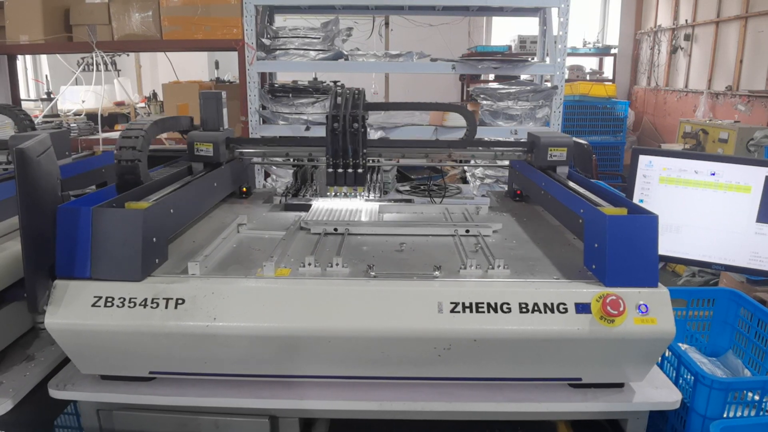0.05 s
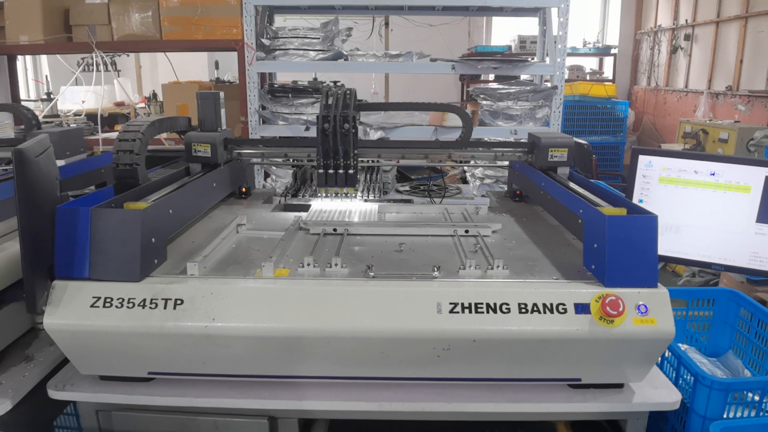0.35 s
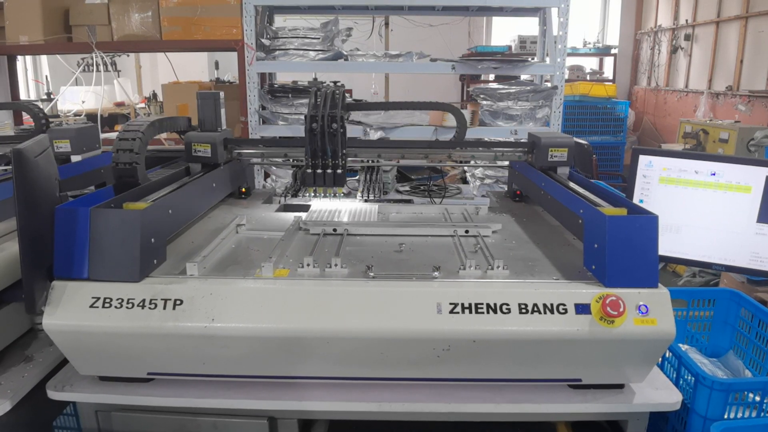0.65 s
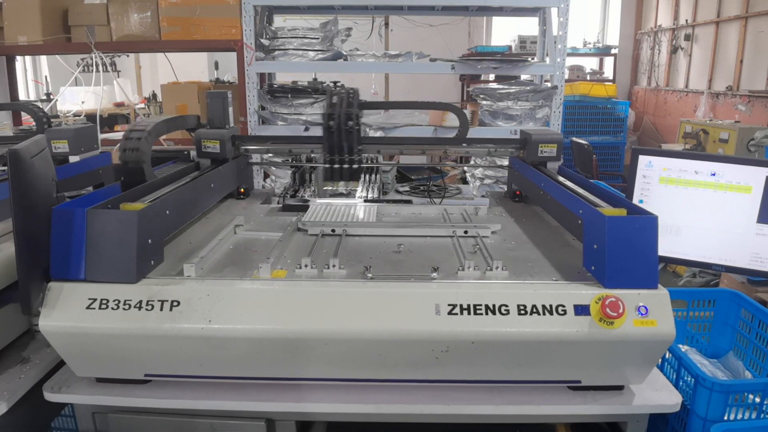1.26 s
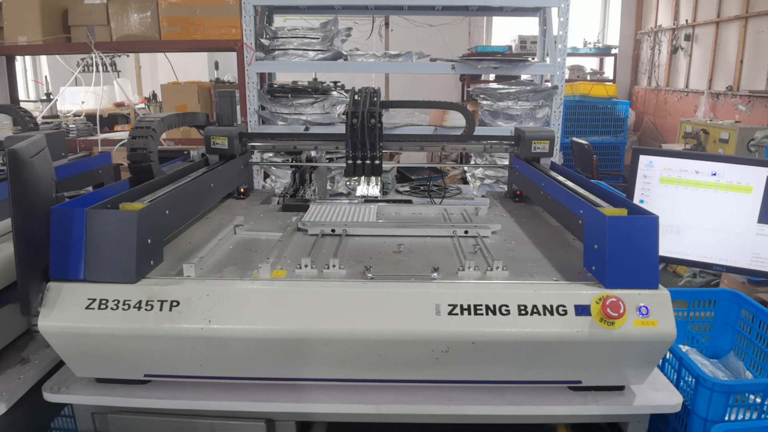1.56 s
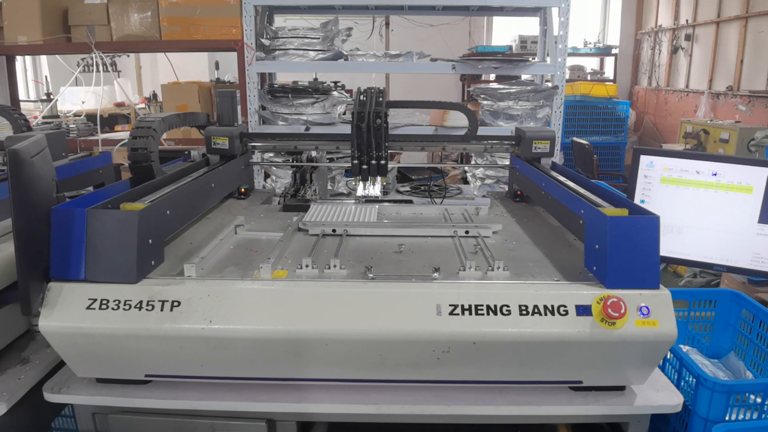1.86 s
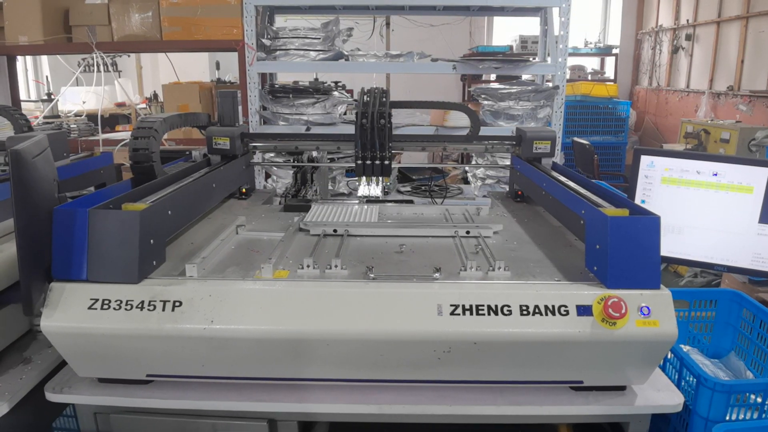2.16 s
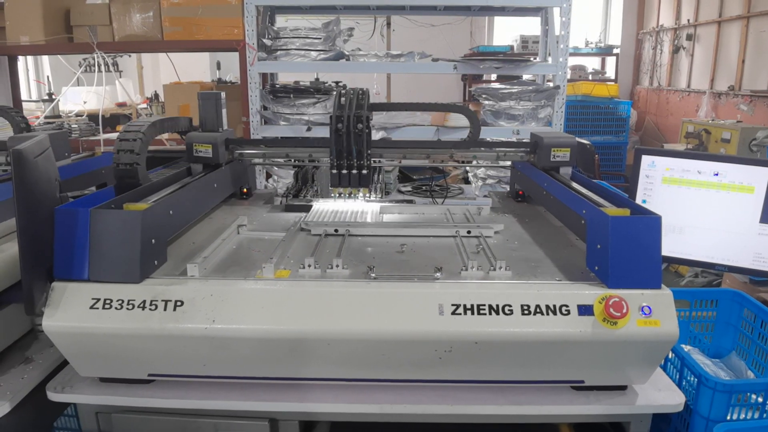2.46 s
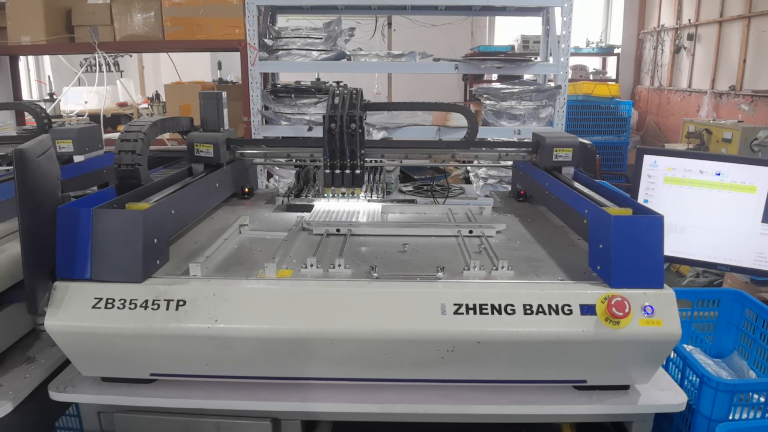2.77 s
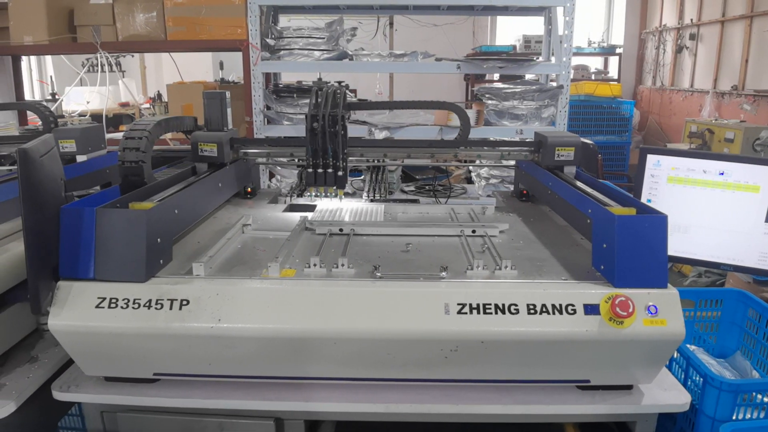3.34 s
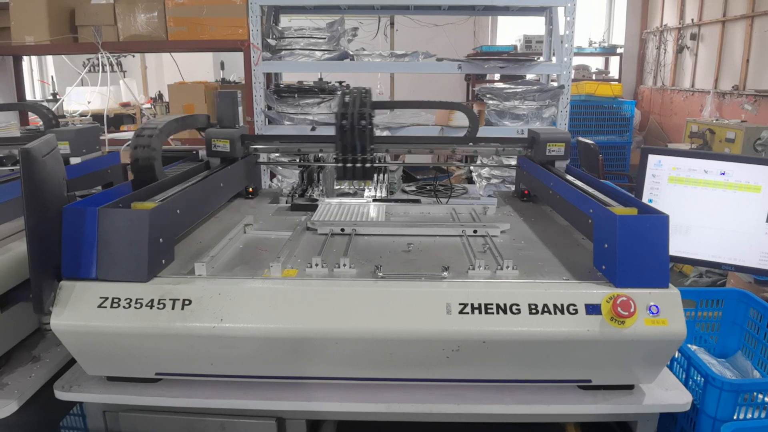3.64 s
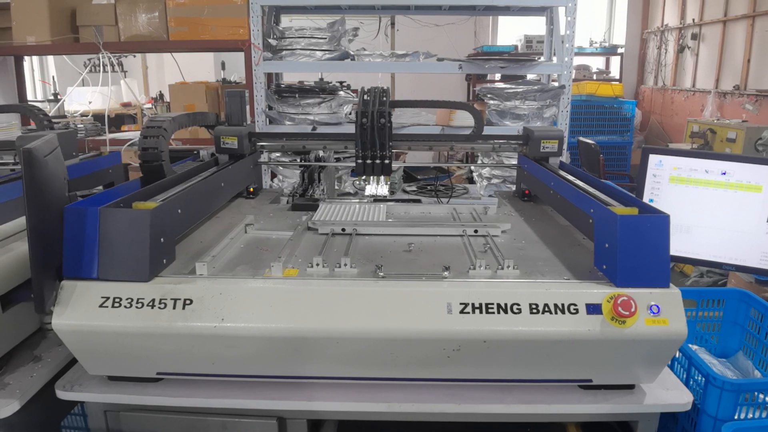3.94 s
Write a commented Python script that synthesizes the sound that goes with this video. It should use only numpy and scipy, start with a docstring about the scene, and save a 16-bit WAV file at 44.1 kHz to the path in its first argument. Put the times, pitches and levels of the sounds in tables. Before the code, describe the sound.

A desktop assembly machine hisses brightly with thin whistles, the air pausing briefly near 0.2 and 2.4 seconds. Its head rushes along rails with a rattle and soft thump at the start and around 1.3, 2.4 and 3.7 seconds, with quieter moves between. Valves puff and tick near 0.6, 1.6, 3.1 and 3.9 seconds. Small motors whir and faintly whine upward throughout, over a low workshop rumble.

```python
"""A bright hiss and the rush of a fast gantry run are heard first: a desktop pick-and-place machine at work.
Air drawn through its vacuum nozzles hisses and whistles, pausing twice. In fast and slow runs, bearing balls
rattle along the rails and excite the modes of the frame. The shaken table sways and hums, small motors whir
as the nozzles go up and down, valves puff and tick, and axis motors whine upwards as they gather speed.
The low rumble of the workshop lies underneath."""
import sys
import numpy as np
from scipy import signal
from scipy.fft import rfft, irfft
from scipy.io import wavfile

SR = 44100
rng = np.random.default_rng(int(sys.argv[2]) if len(sys.argv) > 2 else 0)


def wav_out(sig):
    """Save sig, one row per channel (or a flat mono array), as 16-bit PCM at SR to the path in sys.argv[1]."""
    wavfile.write(sys.argv[1], SR, np.round(np.clip(np.atleast_2d(sig).T, -1, 1) * 32767).astype(np.int16))


N = 176400
T = np.arange(N) / SR
HZ = np.maximum(np.arange(N // 2 + 1) * SR / N, 1)

# likeness of the sound at the two ears: (frequency [Hz], coherence [0-1])
COHERENCE = [(100, 0.92), (300, 0.9), (700, 0.4), (1300, 0), (2200, 0), (8000, 0.01)]
# air flow through the nozzles: (time [s], level [dB])
AIR_FLOW = [(0, -23), (.15, -26), (.2, -39.5), (.245, -38), (.325, -25), (.43, -23.5), (.62, -25),
            (.82, -25.5), (1.3, -26.5), (1.6, -26.5), (2.36, -24.5), (2.41, -28), (2.44, -41.5),
            (2.5, -37.5), (2.6, -26.5), (2.77, -24), (3.3, -27), (4, -26.5)]
# spectral shape of the hiss: (frequency [Hz], left level [dB], right level [dB])
HISS_SPECTRUM = [(1050, -42, -31), (1725, -42, -26), (2160, -35, -27), (2550, -47, -16),
                 (3190, -23.5, -13.5), (4160, -13, -7.5), (4660, -28, -9), (5240, -16, -3),
                 (5960, -10, 0.5), (6320, -29, -3), (7440, -20.5, -2), (8190, -39, -10), (8980, -12, -19.5),
                 (10500, -18, -16), (13300, -19.5, -23), (15100, -18.5, -35), (15960, -7.5, -17)]
HIGH_WHISTLE_HZ, LOW_WHISTLE_HZ = 5930, 4060
# nozzle whistles: (peak time [s], duration [s], level over the flow [dB], pitch [Hz], bandwidth [Hz])
NOZZLE_WHISTLES = [(0.605, 0.77, 3, HIGH_WHISTLE_HZ, 330), (1.27, 0.65, 2.5, HIGH_WHISTLE_HZ, 280),
                   (2.75, 0.34, 2, HIGH_WHISTLE_HZ, 380), (3.24, 1.95, 2.5, HIGH_WHISTLE_HZ, 280),
                   (2.97, 1.07, -2.5, LOW_WHISTLE_HZ, 130), (3.535, 0.39, -4, LOW_WHISTLE_HZ, 130)]
# gantry runs: (time of top speed [s], speeding up [s], slowing down [s], level [dB],
# cutoff at top speed [Hz], boom relative to the run [dB], drone relative to the run [dB])
GANTRY_RUNS = [(0.02, 0.072, 0.25, -17, 1570, -10, -12.5), (0.439, 0.055, 0.39, -32.5, 2090, -37, -20),
               (1.316, 0.11, 0.16, -15.5, 1770, -6.5, -16), (1.475, 0.092, 0.26, -25.5, 1500, -17, -23),
               (1.958, .26, 0.18, -31.5, 3280, -25, -30), (2.39, 0.085, 0.21, -16.5, 1430, -6, -4),
               (2.71, 0.3, 0.14, -28.5, 1610, -23, -30), (3.31, 0.24, 0.1, -33.5, 1360, -33, -5.5),
               (3.689, 0.11, 0.25, -16.5, 1640, -9.5, -41)]
# spectral shape of the rolling noise: (frequency [Hz], level [dB])
RAIL_SPECTRUM = [(40, -6), (150, -12), (240, -4.5), (450, -5.5), (600, -7.5), (900, -5), (1350, -2),
                 (1600, -4), (3000, -4)]
# resonances of the frame: (frequency [Hz], relative level [dB])
FRAME_MODES = [(185, -12), (398, -9), (562, -6.5), (610, 0.5), (690, -2.5), (727, 2.5), (800, 1.5),
               (916, -1), (1025, -2.5), (1076, 0.5), (1123, -4), (1203, 0), (1320, -5), (1365, 3)]
# spectral shape of the workshop background: (frequency [Hz], level [dB])
WORKSHOP_SPECTRUM = [(35, -3), (100, -4), (140, -10), (190, -2.5), (240, -12.5), (300, -7.5), (400, -15),
                     (800, -21.5), (1500, -19), (4000, -15), (7000, -28), (10000, -15)]
# swells of the table's low hum: (peak time [s], duration [s], level [dB])
TABLE_HUMS = [(.15, 0.16, -32), (.48, 0.033, -37), (.93, 0.31, -42), (3.1, 0.1, -38), (3.4, 0.2, -35)]
# low sways of the table as the gantry moves: (peak time [s], duration [s], level [dB])
TABLE_SWAYS = [(.53, 0.21, -37.5), (1.39, 0.34, -31.5), (1.75, 0.34, -34), (2.06, 0.32, -40.5),
               (2.551, 0.28, -37.5), (3.242, 0.39, -39.5), (3.698, 0.57, -37.5)]
# nozzles lifting and lowering: (peak time [s], duration [s], level [dB], top pitch [Hz])
NOZZLE_LIFTS = [(0.47, 0.2, -37.5, 2500), (0.935, 0.14, -38, 2710), (1.165, 0.17, -35, 2803),
                (1.578, 0.33, -37, 2655), (1.841, 0.25, -32.5, 2596), (2.004, 0.16, -33, 2840),
                (2.52, 0.34, -38, 2740), (2.975, 0.12, -38.5, 2587), (3.17, 0.13, -33, 2550),
                (3.387, 0.13, -37.5, 2690), (3.79, 0.24, -33, 2367), (3.954, 0.25, -37, 2470)]
# air let out by the valves: (onset [s], level [dB], pitch [Hz], attack [s], hold [s])
VALVE_PUFFS = [(0.62, -26.5, 11600, 0.0092, 0.037), (1.561, -27, 9840, .008, 0.063),
               (3.09, -26, 11150, 0.037, 0.039), (3.942, -24, 9500, 0.0044, 0.021)]
# valves switching: (onset [s], level [dB])
VALVE_TICKS = [(0.682, -23), (1.28, -31), (1.578, -22), (1.665, -24.5), (2.945, -22.5), (3.15, -23),
               (3.415, -31)]
# axis motors speeding up: (peak time [s], duration [s], level [dB], pitch at the peak [Hz])
AXIS_WHINES = [(0.882, 0.12, -43.5, 285), (1.11, 0.12, -49, 295), (1.252, 0.15, -35.5, 392),
               (2.564, 0.12, -36.5, 400), (2.625, 0.13, -39.5, 505), (3.147, 0.13, -45, 280),
               (3.564, 0.15, -40.5, 285)]


def from_db(db):
    """Amplitude grows tenfold for every 20 dB."""
    return 10 ** (np.asarray(db) / 20)


def unit_power(x):
    """Division by the root mean square gives a power of one."""
    return x / np.sqrt(np.mean(x ** 2) + 1e-20)


def over_hz(points, column=1):
    """Interpolation of a spectrum table on a logarithmic frequency axis."""
    points = np.array(points)
    return np.interp(np.log(HZ), np.log(points[:, 0]), points[:, column])


def coloured(x, gain):
    """Linear filtering multiplies the spectrum by a gain; unit power."""
    return unit_power(irfft(rfft(x) * gain, N))


def resonance(hz, width_hz):
    """Frequency response of a damped oscillator, 1 at its peak."""
    return 1 / (1 + 1j * (HZ ** 2 - hz ** 2) / (HZ * width_hz))


def drift(rate_hz):
    """Low-passed noise gives a random fluctuation of unit power."""
    return coloured(rng.standard_normal(N), 1 / (1 + (HZ / rate_hz) ** 2))


def stereo_noise(gain):
    """Partial coherence: coloured noise, alike at both ears in the bass and unrelated in the treble."""
    alike = np.clip(over_hz(COHERENCE), 0, 1)
    mid, side = rfft(rng.standard_normal((2, N)))
    spectrum = np.sqrt(1 + alike) * mid + np.sqrt(1 - alike) * side * [[1], [-1]]
    return unit_power(irfft(gain * spectrum, N))


def swell(peak_s, length_s, db):
    """A raised-cosine envelope: the amplitude rises and falls smoothly."""
    return from_db(db) * np.cos(np.pi / 2 * np.minimum(abs(T - peak_s) / (length_s / 2), 1)) ** 2


def wavering(hz, phase=0, wander_rad=0.75):
    """Random phase modulation broadens a pure tone; unit power."""
    wander = wander_rad * drift(27)
    return np.sqrt(2) * np.sin(2 * np.pi * hz * T + phase + wander + rng.uniform(0, 2 * np.pi))


def reflections(count=12, echo_db=-8.5):
    """Interference with echoes off nearby surfaces ripples the spectrum of a steady sound."""
    delays_s = rng.uniform(0.000958, 0.02, (count, 1))
    echoes = np.exp(-2j * np.pi * HZ * delays_s).sum(axis=0) / np.sqrt(count)
    return abs(1 + from_db(echo_db) * echoes)


def reverberation(x, t60_s=0.95):
    """The diffuse field of the workshop decays exponentially, with a separate tail at each ear."""
    t = T[:SR]
    tail = rng.standard_normal((2, SR)) * from_db(-60 * t / t60_s) * (t > 0.006)
    return signal.fftconvolve(x, unit_power(tail) / np.sqrt(SR), axes=1)[:, :N]


def vacuum_nozzles(hiss_db=6, flutter_db=0.94, whistle_left_db=-10.5):
    """Turbulence in narrow nozzles hisses; resonances swell out of it as breathy whistles."""
    colour = from_db([over_hz(HISS_SPECTRUM, column=1), over_hz(HISS_SPECTRUM, column=2)])
    colour = colour * np.array([reflections(), reflections()])
    flow = from_db(np.interp(T, *np.transpose(AIR_FLOW)) + flutter_db * drift(11.3))
    whistles = sum(swell(peak_s, length_s, db) * stereo_noise(resonance(hz, width_hz))
                   for peak_s, length_s, db, hz, width_hz in NOZZLE_WHISTLES)
    hiss = from_db(hiss_db) * stereo_noise(colour)
    return flow * (hiss + whistles * from_db([[whistle_left_db], [0]]))


def rails(clicks_per_s=520, click_db=-1.5, roughness_db=-1.5):
    """Rolling contact: bearing balls add random impacts to a broad, rough noise."""
    clicks = unit_power((rng.random(N) < clicks_per_s / SR) * rng.standard_normal(N))
    contact = stereo_noise(1) + from_db(click_db) * clicks
    rolling = coloured(contact, from_db(over_hz(RAIL_SPECTRUM)))
    return from_db(roughness_db * drift(60)) * rolling


def frame(vary_db=4.5, vary_hz=20, spread_rad=0.75):
    """Modal vibration: each mode swells and fades on its own, with its own phase at each ear."""
    modes = 0
    for hz, db in FRAME_MODES:
        level = from_db(db + vary_db * drift(vary_hz))
        modes = modes + level * wavering(hz, spread_rad * rng.standard_normal((2, 1)))
    return unit_power(modes)


def panel(push, hz, t60_s):
    """Forced resonance: a panel's vibration builds up under a push and decays exponentially."""
    decay = from_db(-60 / (t60_s * SR))
    return signal.lfilter([1 - decay], [1, -decay], push + 1e-18) * wavering(hz)


def gantry(rails_db=5.5, frame_db=-5, room_db=-10, speed_exponent=1.154):
    """Structure-borne sound: rails and frame grow louder and brighter with speed; two panels resonate."""
    spectrum = rfft(from_db(rails_db) * rails() + from_db(frame_db) * frame())
    runs, boom_push, drone_push = 0, 0, 0
    for peak_s, up_s, down_s, db, cutoff_hz, boom_db, drone_db in GANTRY_RUNS:
        speed = np.interp(T, [peak_s - up_s, peak_s, peak_s + down_s], [0, 1, 0])
        level = from_db(db) * speed ** speed_exponent
        dull, bright = (irfft(spectrum / np.sqrt(1 + (HZ / hz) ** 10), N)
                        for hz in (0.48 * cutoff_hz, cutoff_hz))
        runs = runs + level * ((1 - speed) * dull + speed * bright)
        boom_push = boom_push + from_db(boom_db) * level * speed
        drone_push = drone_push + from_db(drone_db) * level * speed
    boom = panel(boom_push, hz=257, t60_s=0.11)
    drone = panel(drone_push, hz=774, t60_s=0.049) * from_db(-0.5 * drift(73))  # slight flutter
    direct = runs + boom + drone
    airborne = signal.sosfilt(signal.butter(2, 500, "high", fs=SR, output="sos"), direct)
    return direct + from_db(room_db) * reverberation(airborne) * from_db([[-1.2], [1.2]])


def workshop(level_db=-32, swell_db=4):
    """Ambient noise: a low rumble and a faint hiss, made hollow by comb filtering from nearby surfaces."""
    colour = from_db(over_hz(WORKSHOP_SPECTRUM)) * np.where(HZ > 600, reflections(), 1)
    return from_db(level_db + swell_db * drift(1)) * stereo_noise(colour)


def table(sway_hz=104, hum_hz=182):
    """Forced vibration: shaken by the moves, the table sways and hums at two low frequencies."""
    sway = sum(swell(*row) for row in TABLE_SWAYS) * wavering(sway_hz)
    hum = sum(swell(*row) for row in TABLE_HUMS) * wavering(hum_hz)
    return sway + hum


def nozzle_motors(half_width_hz=840, glide=0.19, pan_db=-4, room_db=-6.5):
    """Frequency modulation: each whir is a noise band whose pitch rises and falls with motor speed."""
    band = 1 / (1 + (HZ / half_width_hz) ** 4)
    grit = np.array([coloured(rng.standard_normal(N), band) for _ in range(4)])
    grit = grit[:2] + 1j * grit[2:]  # one complex envelope for each ear
    whir = np.zeros((2, N))
    for peak_s, length_s, db, top_hz in NOZZLE_LIFTS:
        moving = abs(T - peak_s) < length_s / 2
        speed = np.cos(np.pi * (T[moving] - peak_s) / length_s)
        phase = 2 * np.pi * np.cumsum(top_hz * (1 - glide * (1 - speed))) / SR
        whir[:, moving] += from_db(db) * speed ** 2 * (grit[:, moving] * np.exp(1j * phase)).real
    whir = whir * from_db([[pan_db], [-pan_db]])
    return whir + from_db(room_db) * reverberation(whir)


def valve_puffs(width_hz=550, t60_s=0.5, sputter_db=1, pan_db=1.5):
    """Jet noise in a narrow band: each puff of air opens quickly, sputters and decays exponentially."""
    puffs = 0
    for onset_s, db, hz, attack_s, hold_s in VALVE_PUFFS:
        opening = np.clip((T - onset_s) / attack_s, 0, 1)
        fading_s = np.maximum(T - onset_s - attack_s - hold_s, 0)
        level = opening * from_db(db - 60 * fading_s / t60_s)
        puffs = puffs + level * stereo_noise(resonance(hz, width_hz))
    return puffs * from_db(sputter_db * drift(250)) * from_db([[pan_db], [-pan_db]])


def valve_ticks(hz=8760, width_hz=2000, t60_s=0.14):
    """Damped transients: a switching valve gives an abrupt burst of bright noise."""
    level = sum((T >= onset_s) * from_db(db - 60 * np.maximum(T - onset_s, 0) / t60_s)
                for onset_s, db in VALVE_TICKS)
    return level * stereo_noise(resonance(hz, width_hz))


def axis_motors(rise_hz_per_s=720):
    """A linear chirp: the whine climbs in pitch as an axis motor gathers speed."""
    whines = 0
    for peak_s, length_s, db, hz in AXIS_WHINES:
        chirp_phase = np.pi * rise_hz_per_s * (T - peak_s) ** 2
        whines = whines + swell(peak_s, length_s, db) * wavering(hz, chirp_phase)
    return whines


def scene():
    """Superposition: the sound pressures of the machine and its workshop add."""
    machine = vacuum_nozzles() + gantry() + axis_motors() + nozzle_motors() + valve_puffs() + valve_ticks()
    return machine + table() + workshop()


def record(dry, cutoff_hz=15850):
    """Band limiting: a steep low-pass filter removes the highest treble."""
    return irfft(rfft(dry) / np.sqrt(1 + (HZ / cutoff_hz) ** 900), N)


dry = scene()
out = record(dry)
wav_out(out)
```